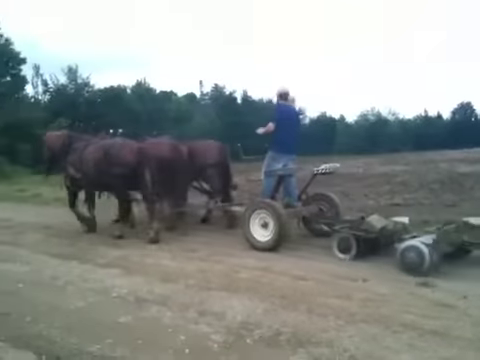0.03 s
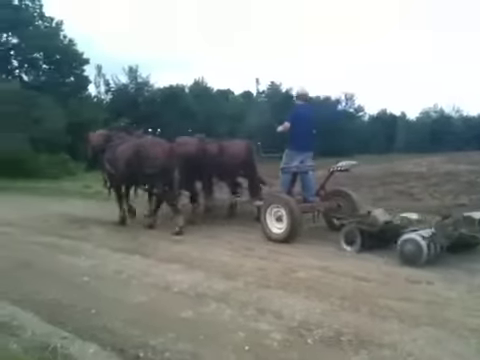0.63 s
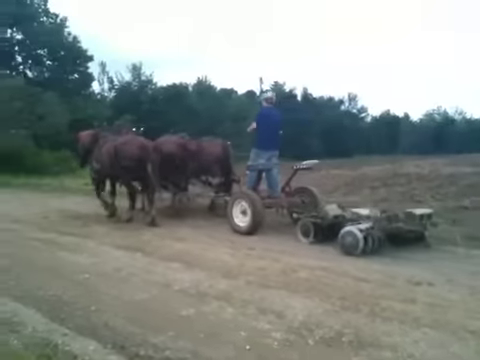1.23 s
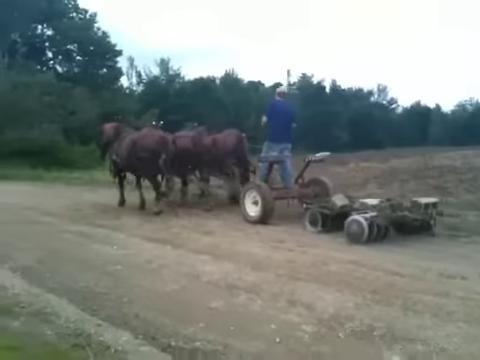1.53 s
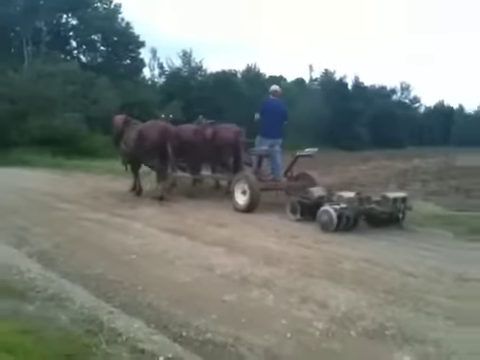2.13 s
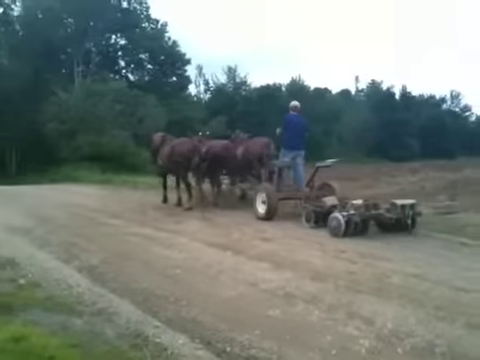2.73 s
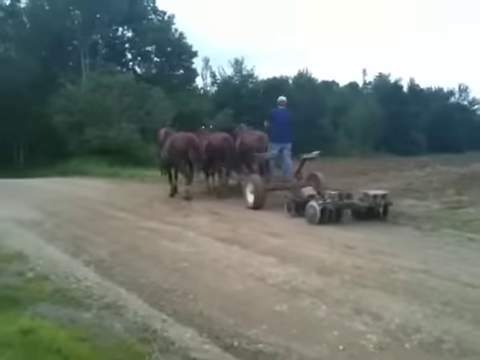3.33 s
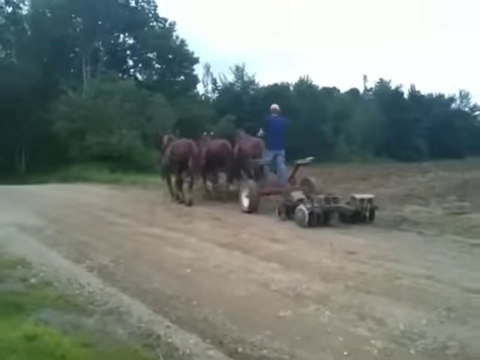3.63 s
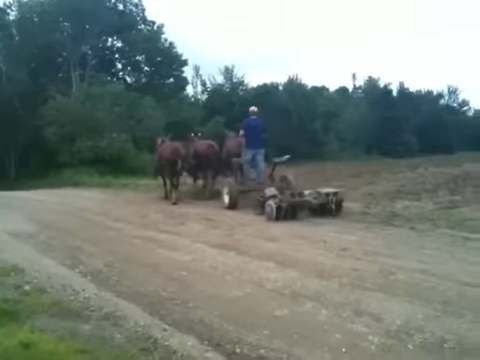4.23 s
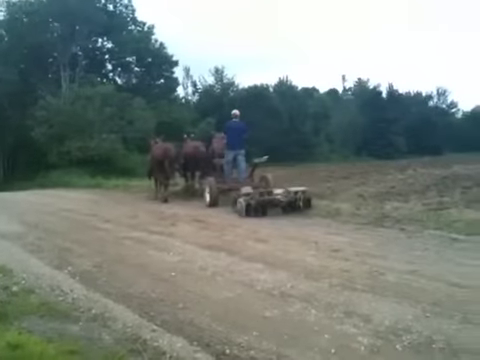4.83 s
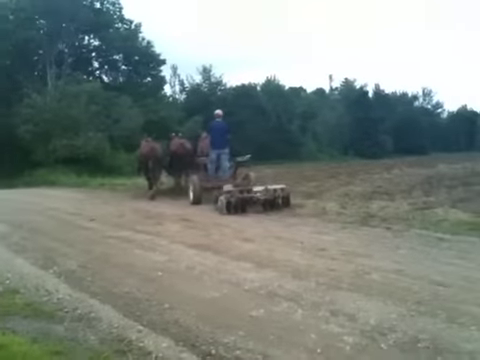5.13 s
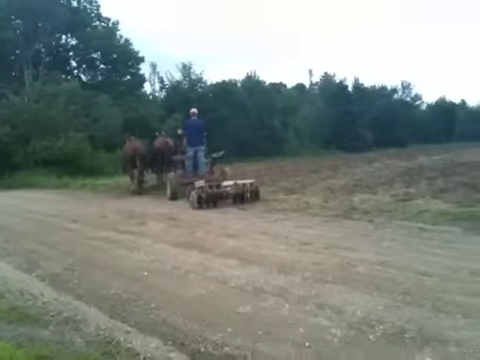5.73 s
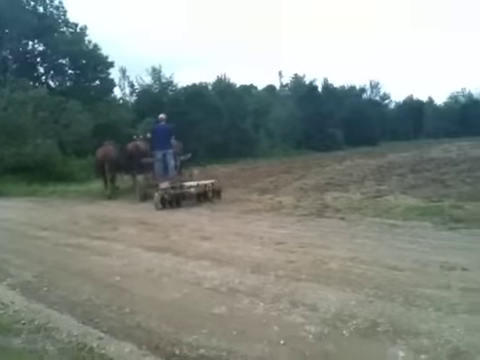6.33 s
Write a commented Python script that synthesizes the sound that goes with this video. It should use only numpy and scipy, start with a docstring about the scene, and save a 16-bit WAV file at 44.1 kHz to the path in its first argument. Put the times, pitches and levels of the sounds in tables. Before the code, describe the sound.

A horse-drawn cart and disc harrow are already close as they roll along a gravel track. Steel discs grind unevenly through grit, crushing stones and snapping pebbles aside, while the loose frame and hitch knock hollowly over a low rumble. A chain clinks brightly at about 0.4 seconds. The knocks bunch together from about 1.4 seconds, and the hardest pebble snaps and loudest knock land at 2.2 seconds. Other clear knocks follow near 3.3 and 4.1 seconds as the rig moves off, the rumble sinking and the crunching growing steadily quieter. The chain clinks three more times between 4.3 and 4.9 seconds. A dry bearing gives two faint, high squeaks at around 5.3 and 5.4 seconds. Two last knocks come at about 6.1 and 6.4 seconds over the now more distant grinding. Very faint open-field air lies underneath throughout.

```python
"""A horse-drawn cart and disc harrow pass on a gravel track. At first they are close: steel discs grind
through grit, crush stones and snap pebbles aside, the loose frame and hitch knock hollowly over a low
rumble, and a trace chain clinks. The hardest snaps and the loudest knock come at 2.2 s. Then the rig
moves off and fades; the chains clink again from 4.3 s, a dry bearing squeaks twice after 5.2 s, and
two last knocks follow after 6 s. Faint open air lies under it all."""
import sys
import numpy as np
from scipy import signal
from scipy.io import wavfile
from scipy.ndimage import uniform_filter1d

SR = 44100
rng = np.random.default_rng(int(sys.argv[2]) if len(sys.argv) > 2 else 0)


def wav_out(sig):
    """Save sig, one row per channel (or a flat mono array), as 16-bit PCM at SR to the path in sys.argv[1]."""
    wavfile.write(sys.argv[1], SR, np.round(np.clip(np.atleast_2d(sig).T, -1, 1) * 32767).astype(np.int16))


N = 285327
T = np.arange(N) / SR


# spectra of coarse stones and of fine grit: f/Hz, level/dB
STONE_SPECTRUM = [(100, -52.5), (400, -9.5), (520, -2.5), (950, -4), (1700, -2), (2400, -5), (4000, -8.5),
                  (16000, -37.5)]
GRIT_SPECTRUM = [(300, -88), (1500, 8), (3700, 3.5), (7100, 4.5), (10500, -2.5), (12200, -12.5),
                 (15800, -11)]

def discs():
    """Superposition of many tiny fractures and collisions makes the grinding of discs in gravel."""
    bumps_db = 0.8 * wander(rate_hz=18)
    grind_db = grinding_level() + bumps_db
    _, _, grit_db = passing_levels()
    breaks = fractures(per_s=300, spread_db=4, t60=0.055)  # a breaking stone sounds low and high at once
    stones = breaks + gain_of(-6.5) * pebbles(count=5000, lo_hz=480, hi_hz=3010, cycles=80, spread_db=2)
    sand = fractures(per_s=380, spread_db=5.5, t60=0.02)
    chips = pebbles(count=7000, lo_hz=2800, hi_hz=13500, cycles=190, spread_db=4.7)
    grit = gain_of(-2) * breaks + gain_of(-3.5) * sand + gain_of(-2.5) * chips
    coarse = colour(stones * gain_of(grind_db - 6.5), STONE_SPECTRUM)
    fine = colour(grit * gain_of(grind_db + grit_db - 12), GRIT_SPECTRUM)
    return coarse + fine


# scrapes as the discs drop and bite: t/s, duration/s, level/dB re steady rolling
BITES = [(0.242, 0.074, 1.5), (0.459, 0.058, 5), (0.663, 0.31, 2.5), (1.506, 0.15, -0.5),
         (1.706, 0.14, 1.5), (2.004, 0.13, 3), (2.309, 0.074, 3.5), (2.441, 0.079, 4), (2.58, 0.037, 4.5),
         (2.786, 0.32, 0), (2.998, 0.066, -0.5), (3.526, 0.081, 4.5), (3.655, 0.36, 2.5),
         (4.051, 0.13, 2.5), (4.673, 0.2, 3.5), (5.06, 0.21, 2.5), (5.37, 0.059, 6), (5.69, 0.25, -0.5)]
# lulls as the discs lift over a bump: t/s
LULLS = [0.436, 0.665, 1.175, 1.335, 1.473, 1.685, 1.93, 2.275, 2.441, 2.67, 2.965, 3.35, 4.03, 5.655, 6.0,
         6.46]

def grinding_level(rise_s=0.0084, release_t60=0.11, lull_db=-6, lull_width_s=0.02):
    """Incoherent sources add in power: rolling plus scrapes, dipping at each lull; the result is in dB."""
    power, t = np.ones(N), T[:SR]
    for start, duration, db in BITES:
        attack = np.minimum(t / rise_s, 1)
        fall_db = 60 * np.maximum(t - duration, 0) / release_t60
        add(power, start, (attack * gain_of(db - fall_db)) ** 2)
    rolling_db, _, _ = passing_levels()
    dips_db = lull_db * sum(np.exp(-((T - at) / lull_width_s) ** 2) for at in LULLS)
    return rolling_db + 10 * np.log10(power) + dips_db


# the rig going by: t/s, rolling level/dB, rumble level/dB, grit level/dB (each on its own relative scale)
PASS_BY = [(0, -28, -38, -2), (1.3, -32.5, -43.5, 1), (2.2, -30, -39.5, -3), (2.7, -32.5, -51, -1.5),
           (3.3, -35.5, -46.5, -3), (4.4, -40, -54, -1.5), (5.499, -45, -57.5, 2.5),
           (6.47, -44.5, -57.5, -1)]

def passing_levels():
    """Level falls with distance: the curves for rolling, rumble and the share of grit, in dB."""
    times, *levels = np.transpose(PASS_BY)
    return [np.interp(T, times, db) for db in levels]


def fractures(per_s, spread_db, t60):
    """Avalanche noise: gravel breaks at random times, each break a burst that decays exponentially."""
    when, size, chance = rng.random((3, 16384))
    happens = chance < per_s * T[-1] / len(when)
    amplitudes = gain_of(spread_db * np.minimum(-np.log(size), 3)) * happens
    onsets = np.bincount((when * N).astype(int), amplitudes ** 2, N)
    power = signal.lfilter([1], [1, -gain_of(-60 / (t60 * SR)) ** 2], onsets)
    envelope = np.sqrt(abs(uniform_filter1d(power, size=SR // 300)))
    return unit_rms(envelope * rng.standard_normal(N))


def pebbles(count, lo_hz, hi_hz, cycles, spread_db):
    """Free vibration after impact: each colliding stone is a damped sinusoid of its own frequency."""
    when, pitch, size = rng.random((count, 3)).T
    hz, t = np.geomspace(lo_hz, hi_hz, 256)[:, None], T[:640]
    t60 = np.minimum(cycles / hz, 0.03)
    weight = np.sqrt(hz / t60)  # equal power per Hz on average
    rings = gain_of(-60 * t / t60) * weight * np.sin(2 * np.pi * hz * t)
    gains = gain_of(spread_db * np.minimum(-np.log(size), 3))
    out = np.zeros(N + len(t))
    for at, stone, gain in zip((when * N).astype(int), (pitch * len(hz)).astype(int), gains):
        out[at:at + len(t)] += gain * rings[stone]
    return unit_rms(out[:N])


# jolts of the loose frame: t/s, relative level/dB, f/Hz, thud offset/dB,
# side-mode offset/dB (low for a square blow)
KNOCKS = [(0.055, -27, 504, -21, -1), (0.141, -30, 639, -23, 10), (0.318, -19, 594, -4.5, 0.5),
          (0.48, -23, 620, -4.5, 1), (0.5, -26.5, 555, -3, 6), (0.61, -25, 637, -29, -14),
          (0.779, -26, 524, -21, -16), (0.907, -25.5, 506, -21, -15), (1.019, -27.5, 608, -2.5, -6),
          (1.394, -23.5, 515, -33, -24), (1.403, -24.5, 633, -11, 5), (1.655, -18, 627, -12, -1),
          (1.686, -26, 630, -7.5, -9), (1.789, -20, 621, -13, 3), (1.809, -22.5, 630, -11, 7),
          (1.894, -23, 635, -13, 2), (2.162, -18, 634, -21, 2.5), (2.2207, -11, 630, -11.5, 0),
          (2.901, -26.5, 624, -11, -4), (2.95, -24.5, 649, -12, -2.5), (3.2677, -15.5, 638, -15.5, -4),
          (3.669, -27, 500, -42, -23), (4.147, -19, 617, -17, -3), (6.134, -21, 616, -25, -11),
          (6.4228, -25, 612, -20, -18)]
# modes of the frame: frequency ratio, level/dB, decay-time ratio
FRAME_MODES = [(.85, 3, 0.27), (1.003, 1.5, 1.21), (1.16, -11.5, 1.1), (1.55, -11.5, 0.39),
               (2.7, -16.5, 0.17)]
# low modes of the cart's bed: f/Hz, level/dB, T60/s
BED_MODES = [(234, -13, 0.066), (298, 7, 0.021), (374, 2.5, 0.04)]

def knocks(base_t60=0.098, choke_s=0.036, tail_db=-8):
    """Impact excites the normal modes of frame and bed; friction in the joints chokes the frame's ring."""
    ring, thump, t = np.zeros(N), np.zeros(N), T[:SR // 6]
    thud = sum(gain_of(db - 60 * t / t60) * np.sin(2 * np.pi * hz * t) for hz, db, t60 in BED_MODES)
    thud *= attack_curve(t, 0.002)
    # each blow lands at another spot and favours other modes
    spots_db = -0.5 * rng.uniform(-0.77, 1, (len(KNOCKS), len(FRAME_MODES)))
    is_side_mode = np.array([abs(ratio - 1) > 0.05 for ratio, _, _ in FRAME_MODES])
    chokes = choke_s * rng.uniform(0.9, 1.3, len(KNOCKS))
    for (start, db, hz, thud_db, side_db), spot_db, choke in zip(KNOCKS, spots_db, chokes):
        modes = np.zeros(len(t))
        for (ratio, mode_db, hold), strike_db in zip(FRAME_MODES, spot_db + side_db * is_side_mode):
            decay = gain_of(mode_db + strike_db - 60 * t / (base_t60 * hold))
            modes += decay * np.sin(2 * np.pi * hz * ratio * t)
        friction = gain_of(np.maximum(-20 * (t / choke) ** 3, tail_db))
        knock = modes * attack_curve(t, 0.0014) * friction
        add(ring, start, gain_of(db + 2.5) * knock / abs(knock).max())
        add(thump, start, gain_of(db + thud_db + 8.5) * thud)
    # so small a body radiates little deep bass
    highpass = signal.butter(4, 160, "highpass", fs=SR, output="sos")
    judder = 1 + 0.2 * wander(rate_hz=140)
    return ring * judder + signal.sosfilt(highpass, thump)


# large stones crushed under a disc: t/s, relative level/dB
CRUNCHES = [(0.066, -25), (0.139, -26), (0.309, -22.5), (0.373, -31.5), (0.48, -23), (0.609, -24),
            (0.886, -23.5), (0.964, -27.5), (1.013, -23), (1.4, -28), (1.492, -32), (1.62, -26),
            (1.734, -21.5), (1.811, -22.5), (2.04, -25), (2.344, -27), (2.461, -27.5), (2.593, -30.5),
            (2.695, -23), (2.761, -34), (2.893, -27.5), (3.057, -30.5), (3.107, -32), (3.382, -33),
            (3.419, -28), (3.465, -29.5), (3.666, -28), (3.82, -31), (3.918, -28.5), (3.958, -31),
            (4.055, -31), (4.23, -37), (4.469, -29.5), (4.716, -33), (4.778, -31), (4.846, -33),
            (4.925, -41), (5.073, -37), (5.106, -38.5), (5.164, -32.5), (5.205, -41.5), (5.743, -38.5),
            (6.13, -38.5), (6.227, -36.5), (6.418, -46)]
# spectra of the crushing noise and of the ringing clack: f/Hz, level/dB
CRUSH_SPECTRUM = [(100, -31), (400, -3), (600, 9), (950, 7), (2300, 3.5), (4200, -9), (16000, -35)]
CLACK_SPECTRUM = [(150, -42), (600, -8.5), (4000, -8.5), (16000, 2)]

def crunches(lo_hz=702, hi_hz=4580, clack_t60=0.055):
    """Brittle fracture: a stone splits sharply, rings in ten modes of its own, then crumbles."""
    clack, t = np.zeros(N), T[:SR // 12]
    for (start, db), pitches in zip(CRUNCHES, rng.random((len(CRUNCHES), 10, 1))):
        hz = lo_hz * (hi_hz / lo_hz) ** pitches
        modes = unit_rms(np.sin(2 * np.pi * hz * t).sum(0))
        add(clack, start, gain_of(db - 60 * t / clack_t60) * modes)
    split = bursts(CRUNCHES, rise_s=0.0006, fade_s=0.021) * rng.standard_normal(N)
    debris = fractures(per_s=1500, spread_db=3, t60=0.006)
    crumble = gain_of(-4.5) * bursts(CRUNCHES, rise_s=0.007, fade_s=0.069) * debris
    crush = colour(crumble + split, CRUSH_SPECTRUM)
    return gain_of(1.3) * (crush + gain_of(-5) * colour(clack, CLACK_SPECTRUM))


# pebbles snapping against steel: t/s, relative level/dB
SNAPS = [(0.048, -22.5), (0.1186, -27.5), (0.235, -22), (0.313, -18.5), (0.4539, -28.5), (0.503, -33),
         (0.856, -23), (0.92, -23), (0.945, -18), (1.093, -27), (1.6146, -21), (1.8028, -21),
         (1.8781, -22.5), (2.058, -20.5), (2.2058, -14), (2.21, -15.5), (2.316, -22.5), (2.4984, -21),
         (2.594, -23.5), (2.804, -26.5), (3.204, -21.5), (3.4535, -27.5), (3.661, -24.5), (3.7249, -26.5),
         (3.95, -26), (4.0815, -23.5), (4.13, -34), (4.508, -28), (4.589, -32), (4.7336, -25),
         (5.5034, -28.5), (5.54, -33), (5.59, -34), (5.7044, -36.5), (5.821, -31), (6.165, -31.5),
         (6.317, -35.5)]
# their spectrum: f/Hz, level/dB
SNAP_SPECTRUM = [(300, -20), (1500, 9.5), (3700, 2.5), (5000, 0.5), (7000, 1.5), (10500, -4.5),
                 (12200, -10.5), (15800, -11)]

def snaps():
    """Brief, hard contact gives a broad spectrum: pebbles crack off the disc edges as ringing chips."""
    crack = bursts(SNAPS, rise_s=0.003, fade_s=0.022)
    scatter = gain_of(-8) * bursts(SNAPS, rise_s=0.005, fade_s=0.06)
    hiss = rng.standard_normal(N)
    chips = pebbles(count=12000, lo_hz=2000, hi_hz=12000, cycles=120, spread_db=1)
    return gain_of(-4.5) * colour(unit_rms(hiss + chips) * np.hypot(crack, scatter), SNAP_SPECTRUM)


# spectrum of the shaking rig: f/Hz, level/dB
RUMBLE_SPECTRUM = [(25, -45), (100, -30), (150, -8), (210, 2), (335, 6.5), (430, 3), (540, 4.5),
                   (720, -22.5), (1400, -13), (4000, -70)]
# resonances of the shivering frame: f/Hz, bandwidth/Hz, level/dB re the shaking
SHIVER_MODES = [(538.2, 25, 1), (639, 17, -4)]

def rumble():
    """Forced vibration: the ground shakes the rig, more when the discs bite, and keeps its frame ringing."""
    _, rumble_db, _ = passing_levels()
    grind_db = grinding_level()
    bite_db = grind_db - uniform_filter1d(grind_db, size=SR // 2)
    shake = fractures(per_s=120, spread_db=5, t60=0.12) * gain_of(rumble_db + 0.12 * bite_db)
    ring = np.zeros(N)
    for hz, width, db in SHIVER_MODES:
        resonance = signal.lfilter(*signal.iirpeak(hz, hz / width, SR), shake)
        ring += gain_of(db) * np.sqrt(SR / (np.pi * width)) * resonance
    return gain_of(1.5) * colour(shake, RUMBLE_SPECTRUM) + ring


# links of the trace chains striking: t/s, relative level/dB, centre f/Hz
CLINKS = [(0.364, -13, 5190), (4.305, -23.5, 4200), (4.697, -22, 4130), (4.835, -20.5, 4220),
          (6.177, -35, 3620)]

def clinks(t60=0.04):
    """Beating of close modes: a taut chain link rings briefly at four neighbouring frequencies."""
    out, t = np.zeros(N), T[:SR // 10]
    for (start, db, hz), detune in zip(CLINKS, rng.uniform(-1.07, 1, (len(CLINKS), 4, 1))):
        modes = np.sin(2 * np.pi * hz * (1 + 0.087 * detune) * t).mean(0)
        add(out, start, gain_of(db - 3 - 60 * t / t60) * modes * attack_curve(t, 0.00052))
    return out


# squeaks of the dry bearing: t/s, starting f/Hz, final f/Hz
SQUEAKS = [(5.254, 4800, 4870), (5.42, 4800, 4520)]

def squeaks(duration_s=0.085, level_db=-52):
    """Friction-induced vibration: steel rubs on steel and sings faintly on a rough, gliding pitch."""
    out, size = np.zeros(N), int(duration_s * SR)
    waver = 1 + 0.016 * wander(rate_hz=400)[:size]
    envelope = gain_of(level_db) * np.sqrt(np.hanning(size))
    for start, start_hz, end_hz in SQUEAKS:
        cycles = np.cumsum(np.linspace(start_hz, end_hz, size) * waver) / SR
        add(out, start, envelope * np.sin(2 * np.pi * cycles))
    return out


# spectrum of the open field's air: f/Hz, level/dB
AIR_SPECTRUM = [(25, -20), (90, -1), (250, -6), (700, -17), (2000, -6), (15000, -5)]

def air():
    """Stationary broadband noise: the faint background of the open field."""
    return gain_of(-61) * colour(rng.standard_normal(N), AIR_SPECTRUM)


def gain_of(db):
    """Decibels to amplitude ratio."""
    return 10 ** (np.asarray(db) / 20)


def unit_rms(x):
    """Normalisation to rms 1."""
    return x / np.sqrt(np.mean(x ** 2) + 1e-20)


def add(mix, start_s, sound):
    """Superposes a sound on the mix from start_s."""
    part = mix[max(round(start_s * SR), 0):][:len(sound)]
    part += sound[:len(part)]


def attack_curve(t, rise_s):
    """First-order rise with time constant rise_s."""
    return 1 - np.exp(-t / rise_s)


def bursts(events, rise_s, fade_s):
    """Power summation of bursts into one amplitude envelope; each is 60 dB down after fade_s."""
    power, t = np.zeros(N), T[:SR // 6]
    for start, db in events:
        add(power, start, (gain_of(db - 60 * (t / fade_s) ** 2) * attack_curve(t, rise_s)) ** 2)
    return np.sqrt(power)


def wander(rate_hz):
    """Random modulation of rms 1, up to about rate_hz."""
    return unit_rms(np.interp(2 * rate_hz * T, np.arange(N // 10), rng.standard_normal(N // 10)))


def minimum_phase(x, db_at, size=4096):
    """Causal filter of gain db_at(f); the Hilbert transform of the log gain gives its phase."""
    log_gain = np.log(gain_of(db_at(abs(np.fft.fftfreq(size, 1 / SR)))))
    taps = np.fft.ifft(np.exp(np.conj(signal.hilbert(log_gain)))).real
    return signal.oaconvolve(x, taps[:size // 2])[:len(x)]


def colour(x, spectrum):
    """Spectral shaping that conserves the power of white noise."""
    hz, db = np.transpose(spectrum)

    def db_at(f):
        shape = np.interp(np.log(f + 1), np.log(hz), db)
        return shape - 10 * np.log10(np.mean(gain_of(shape) ** 2))
    return minimum_phase(x, db_at)


def scene():
    """Linear superposition of the rig's sources and the air, in one channel."""
    return (discs() + rumble() + crunches() + snaps() + clinks() + knocks() + squeaks() + air())[None]


# dips and peaks of the path to the listener: near f/Hz, far f/Hz, width/Hz, near gain/dB, far gain/dB
PATH_BANDS = [(388, 419, 54, -8, -7.5), (819, 890, 25.6, -14.5, 6.5), (1004, 925, 107, 4, 2),
              (1185, 1340, 240, -9.5, -4.5), (2106, 2102, 215, -4.5, -8), (2390, 2310, 47, -3, 6.5),
              (2934, 2730, 310, -13, -16), (3490, 3200, 118, -11, -3), (3850, 3640, 110, -3.5, 5.5),
              (4560, 3840, 120, 4.5, 2.5), (4950, 4430, 86, -8, -4), (6040, 5670, 190, -6, -8),
              (6470, 6200, 330, -2.5, 5), (7270, 6830, 300, 0, 4.5), (8530, 8100, 480, -6.5, -6.5),
              (10100, 8900, 740, -1.5, 4.5), (13200, 11330, 430, -6, -8)]

def record(dry):
    """Time-varying transfer function: dips and peaks slide as the rig moves off; a low-pass follows."""
    near_until_s, far_from_s, cutoff_hz = 0.64, 5.98, 15750

    def heard_at(place):
        bands = [(np.interp(place, [0, 1], row[:2]), row[2], np.interp(place, [0, 1], row[3:]))
                 for row in PATH_BANDS]

        def db_at(f):
            return sum(db * np.exp(-((f - hz) / width) ** 2) for hz, width, db in bands)
        return minimum_phase(dry[0], db_at)
    places = np.linspace(0, 1, 9)  # crossfaded in turn, from near (0) to far (1)
    away = np.interp(T, [near_until_s, far_from_s], [0, 1])
    heard = sum(heard_at(place) * np.interp(away, places, places == place) for place in places)
    lowpass = signal.firwin(511, cutoff_hz, window=("kaiser", 9), fs=SR)
    return signal.oaconvolve(heard, lowpass, "same")[None]


dry = scene()
out = record(dry)
wav_out(out)
```